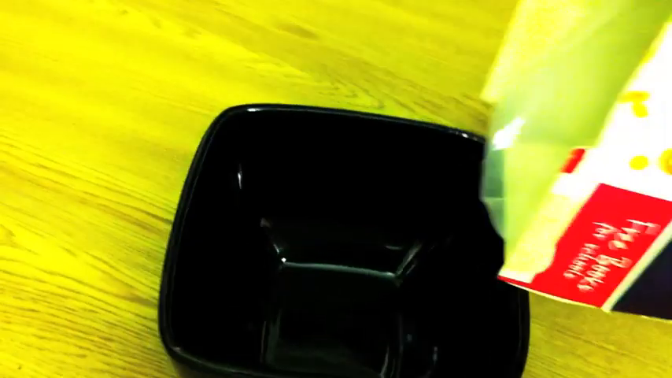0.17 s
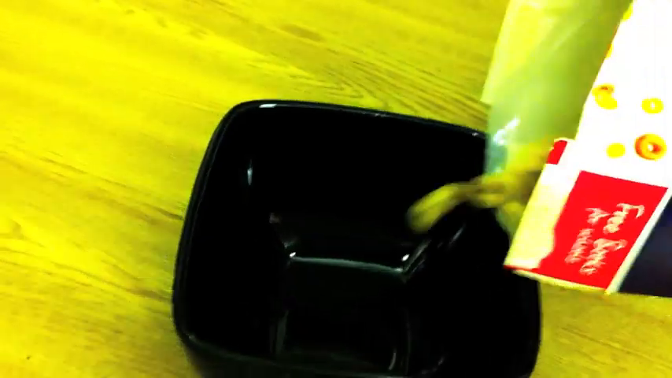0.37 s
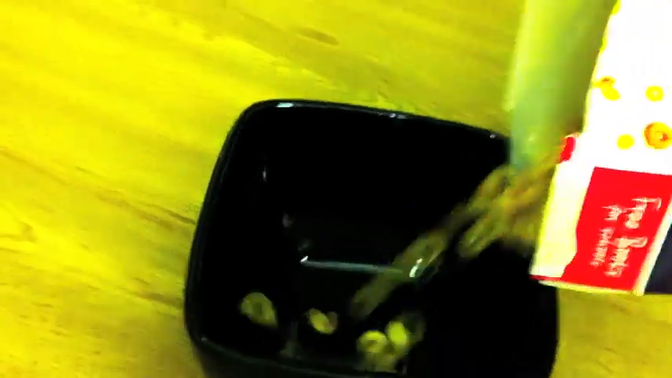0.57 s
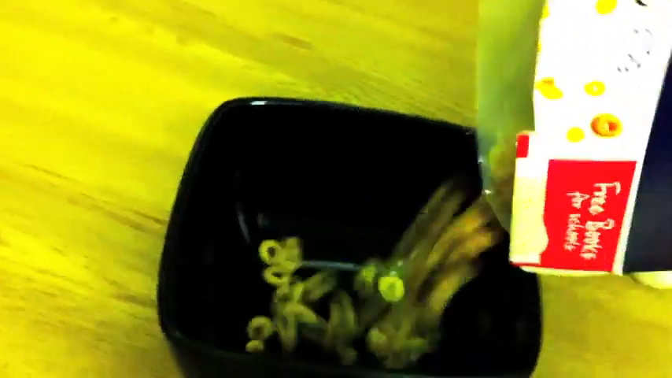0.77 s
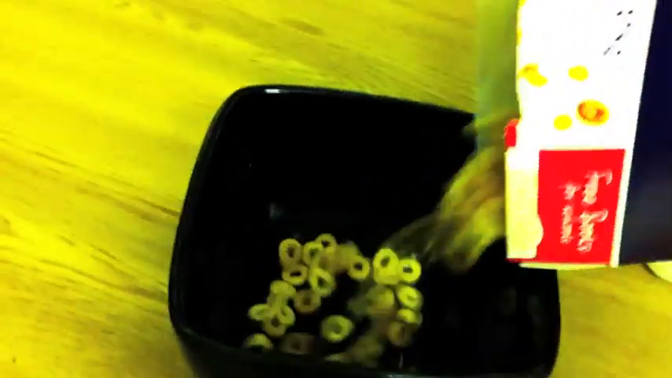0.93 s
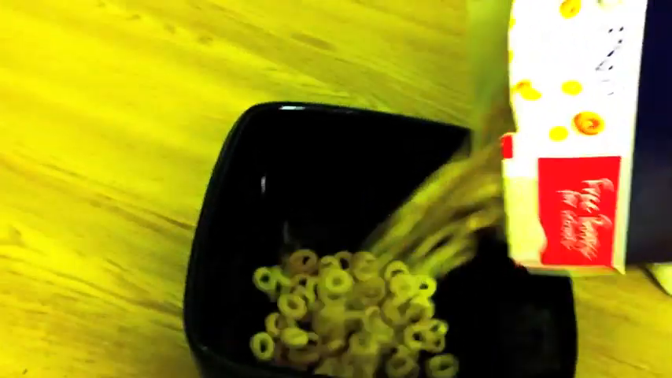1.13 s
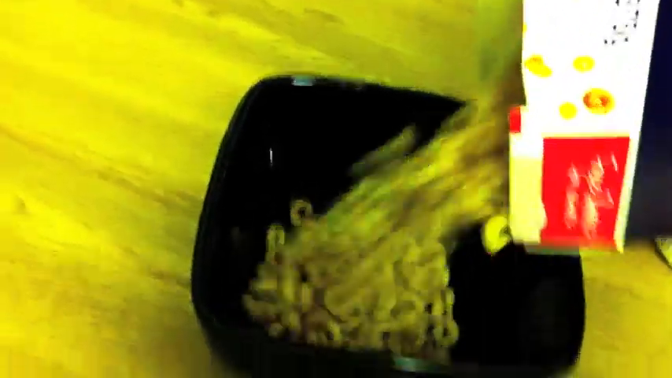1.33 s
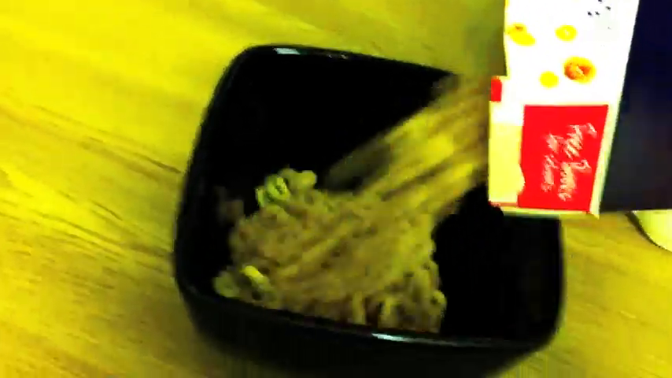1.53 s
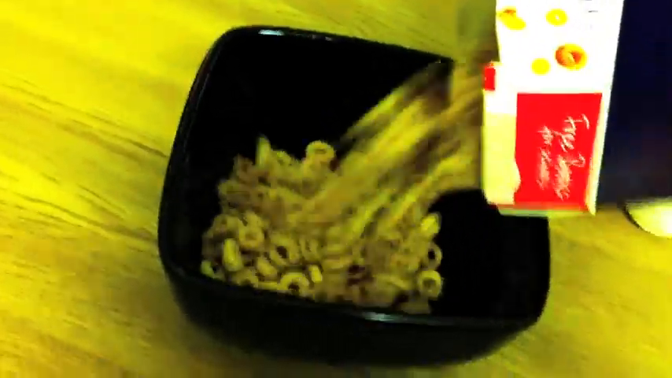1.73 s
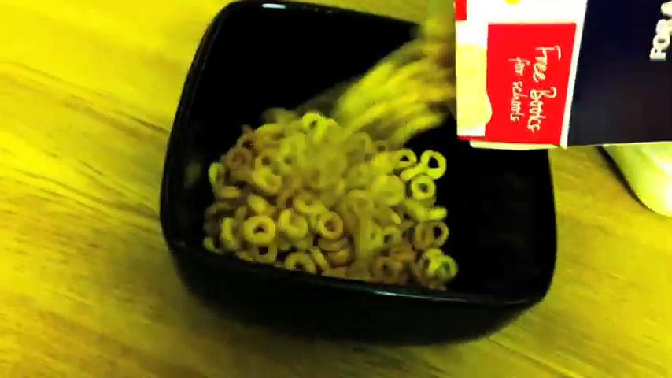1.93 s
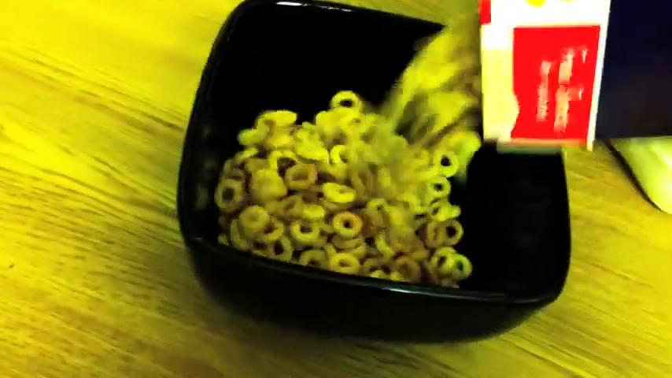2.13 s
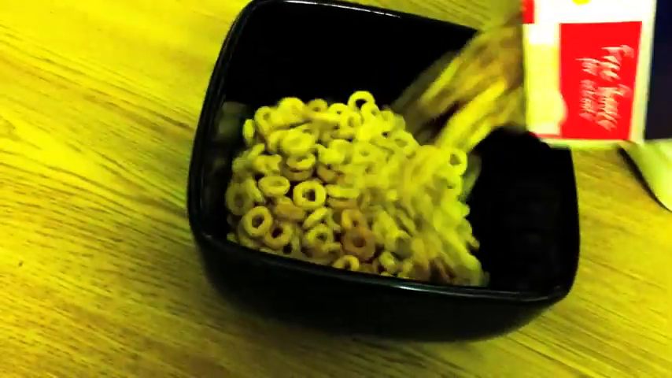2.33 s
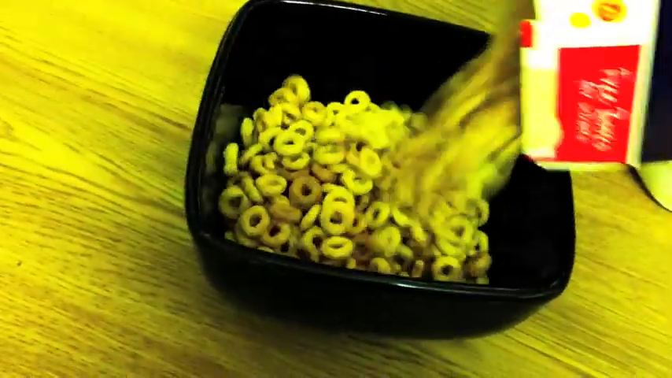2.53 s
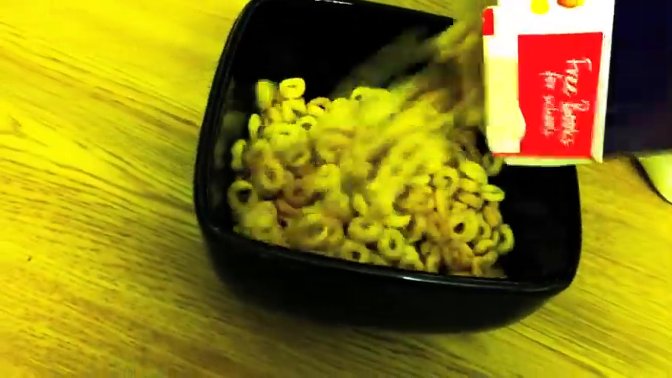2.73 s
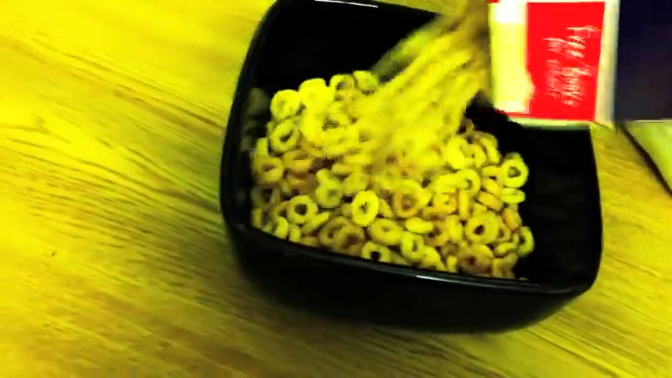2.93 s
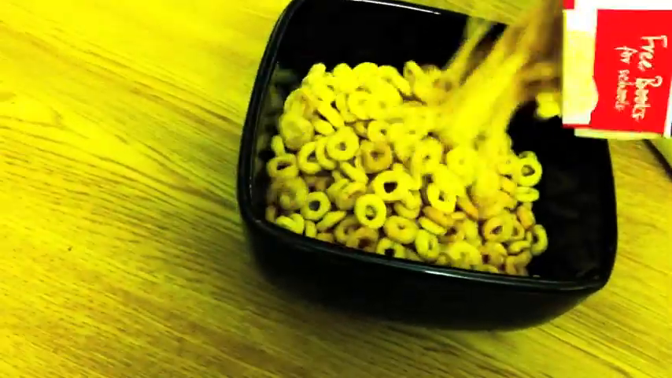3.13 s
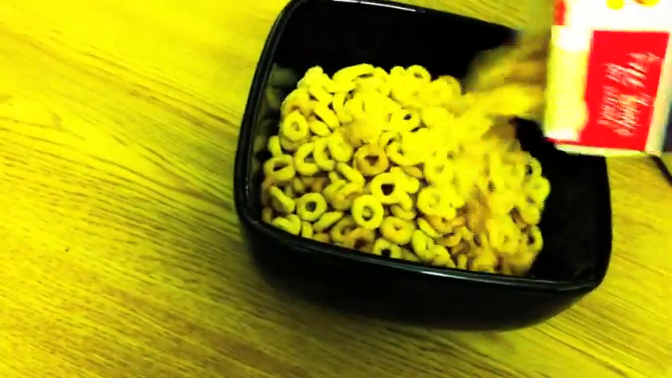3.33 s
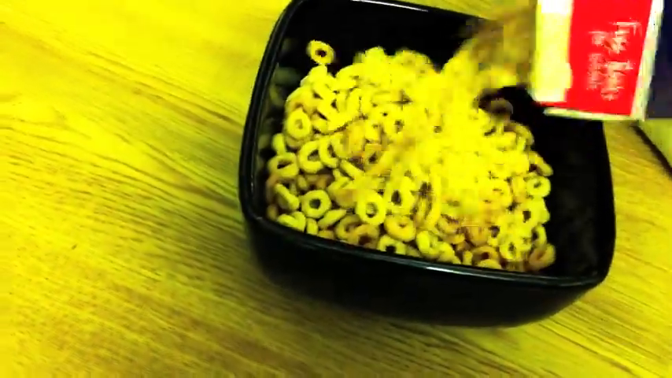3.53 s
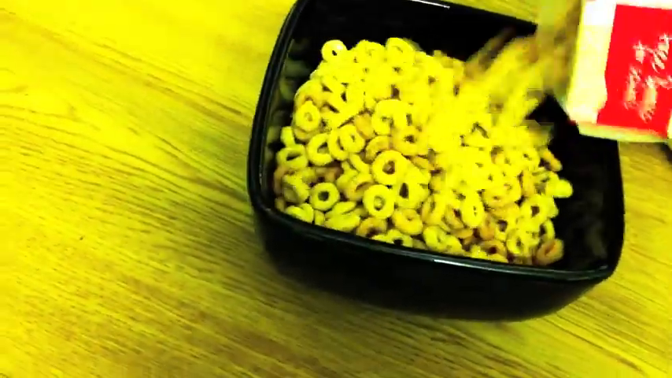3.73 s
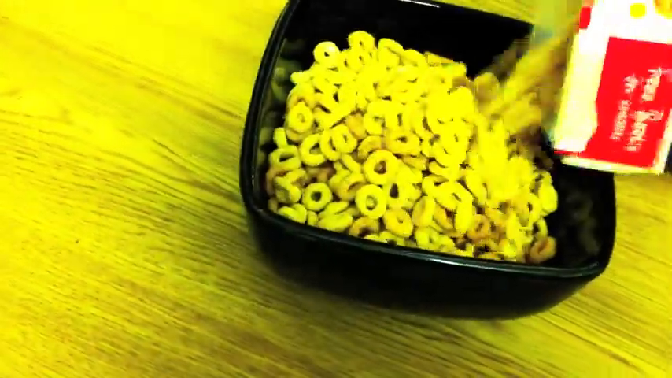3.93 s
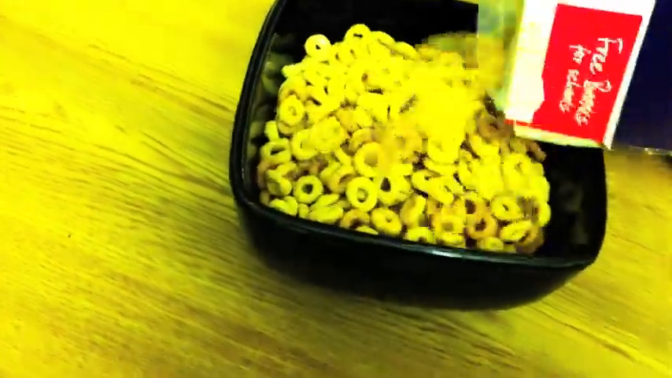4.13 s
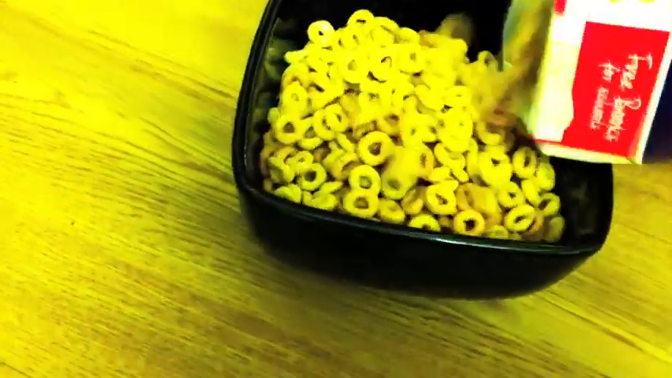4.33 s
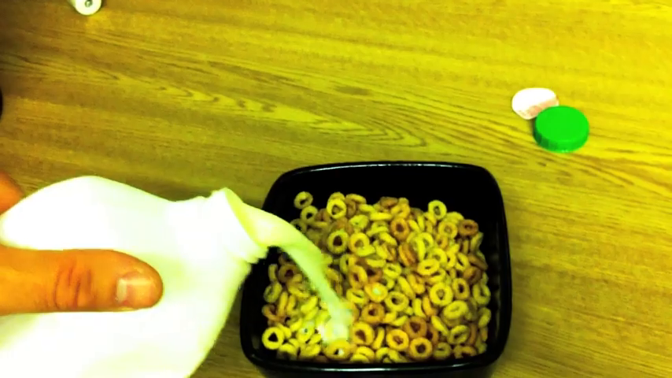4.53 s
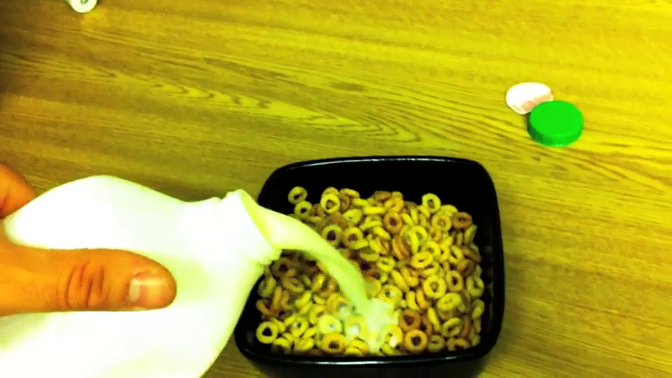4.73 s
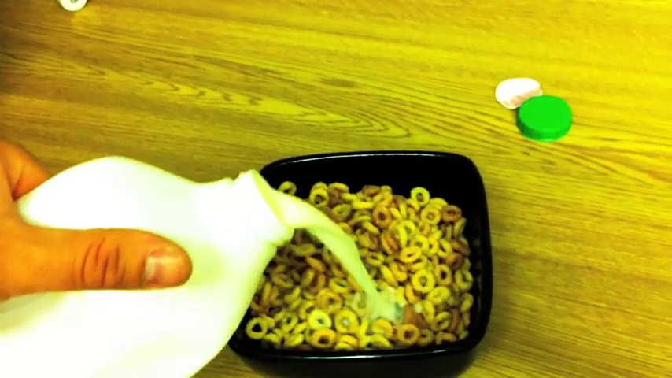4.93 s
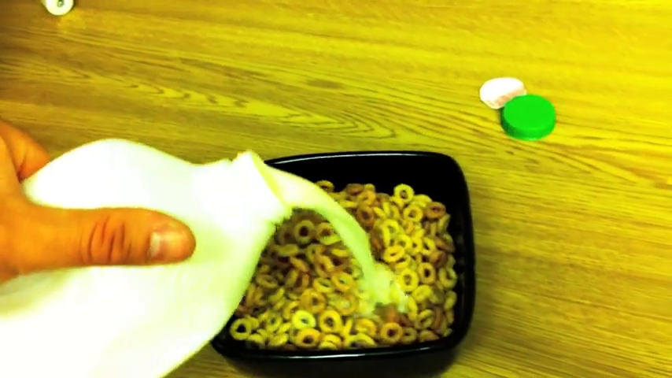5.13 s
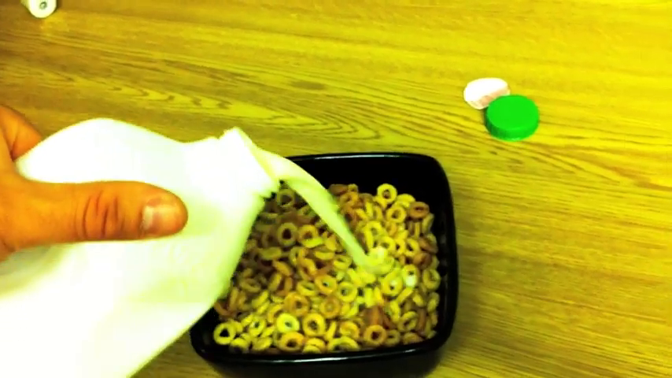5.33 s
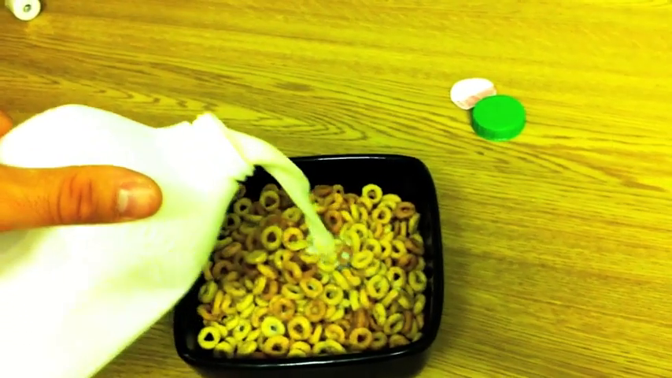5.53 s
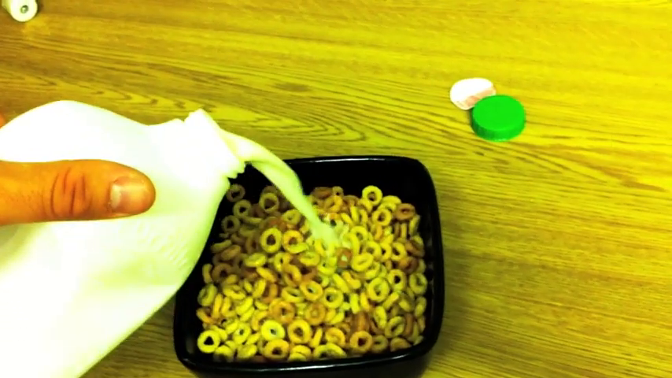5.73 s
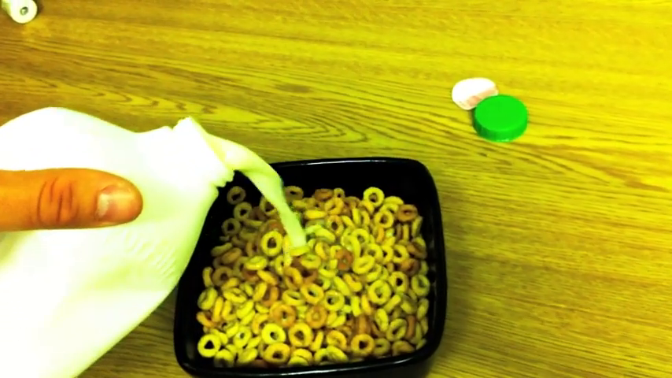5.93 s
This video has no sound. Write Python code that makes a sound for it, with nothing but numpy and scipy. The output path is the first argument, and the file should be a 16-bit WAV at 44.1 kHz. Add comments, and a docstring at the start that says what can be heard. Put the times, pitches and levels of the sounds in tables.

```python
"""First a crinkly scrape with knocks: dry cereal rings slide down a tipped carton, in a small kitchen.
They pour into a hard bowl on a table: clouds of tiny pings rattle hollowly and tick, and hits ring the
bowl's decaying modes, brightly while it is bare and duller on the heap. Soft noise bumps lie below.
The carton is tipped back and the scene fades over to quiet milk: coloured grains trickle and fizz,
rising pings are bubbles, noisy snaps are crackling rings, and steady tones are an appliance's hum."""
import sys
import numpy as np
from scipy import signal
from scipy.fft import rfft, irfft, next_fast_len
from scipy.io import wavfile
from scipy.ndimage import map_coordinates

SR = 44100
rng = np.random.default_rng(int(sys.argv[2]) if len(sys.argv) > 2 else 0)


def file_out(sig):
    """Save sig as 16-bit WAV at sys.argv[1]."""
    # one column per channel
    cols = np.atleast_2d(sig).T
    # limit, then scale
    lim = np.clip(cols, -1, 1)
    pcm = np.round(lim * 32767).astype(np.int16)
    wavfile.write(sys.argv[1], SR, pcm)


N = 268386
TIME_S = np.arange(N) / SR


def amp(db):
    """Decibels to gain."""
    return 10 ** (np.asarray(db) / 20)


def unit(x):
    """Scale to rms 1."""
    return x / np.sqrt(np.mean(x ** 2) + 1e-20)


def along(points, hz):
    """Read (Hz, value) points on a log frequency axis."""
    f, v = np.transpose(points)
    return np.interp(np.log(hz + 1), np.log(f + 1), v)


def curve(rows):
    """Draw straight lines between (time, value) points, one value per sample."""
    s, values = np.transpose(rows)
    return np.interp(TIME_S, s, values)


def gain(rows, edge_s=0.012):
    """Turn a dB curve into a gain that falls silent just outside its span."""
    inside = np.clip(1 + np.minimum(TIME_S - rows[0][0], rows[-1][0] - TIME_S) / edge_s, 0, 1)
    return amp(curve(rows)) * inside


def wobble(rate):
    """A smooth random curve, rate knots a second."""
    knots = rng.standard_normal(int(N * rate / SR) + 4)
    return map_coordinates(knots, [np.arange(N) * rate / SR])


def add(track, s, sound):
    """Mix a sound into the track at s seconds."""
    part = track[max(round(s * SR), 0):][:len(sound)]
    part += sound[:len(part)]


def coloured(x, spectrum, peaks=(), size=8192):
    """Minimum-phase filter: a broad spectrum with narrow resonances (Hz, width Hz, dB) on top."""
    hz = np.fft.rfftfreq(size, 1 / SR)
    level = along(spectrum, hz) + sum(db / (1 + (2 * (hz - f) / width) ** 2) for f, width, db in peaks)
    # folding the cepstrum makes the filter causal
    cepstrum = irfft(np.log(np.maximum(amp(level), 1e-6)))
    cepstrum[1:size // 2] *= 2
    cepstrum[size // 2 + 1:] = 0
    return signal.fftconvolve(x, irfft(np.exp(rfft(cepstrum))))[:len(x)]


def grains(rate, spread_db, life, top_hz, size=96):
    """Tiny contacts at random moments, each a damped ping of its own pitch; even in mean power."""
    rate = np.broadcast_to(rate, N)
    at = np.flatnonzero(rng.random(N) < rate / SR)
    t = np.arange(size) / SR
    spread = np.clip(rng.standard_normal((len(at), 1)), -2, 2)
    # busy moments get weaker grains, which keeps the power even
    strength = amp(spread_db * spread) / np.sqrt(rate[at, None])
    pitch, phase = rng.random((2, len(at), 1))
    pings = strength * np.exp(-t / life) * np.sin(2 * np.pi * (pitch * top_hz * t + phase))
    places = at[:, None] + np.arange(size)
    return unit(np.bincount(places.ravel(), pings.ravel(), N + size)[:N])


def room(x, wet_db, echo_db=-17, count=6, t60=0.14):
    """Direct sound, a few early copies from table and walls, and a noise tail that follows its power."""
    out = np.array(x)
    for delay in rng.uniform(.002, .025, count):
        add(out, delay, amp(echo_db) * x)
    decay = amp(-60 * np.arange(SR // 3) / SR / t60) ** 2
    power = np.abs(signal.fftconvolve(x ** 2, decay / decay.sum())[:len(x)])
    return out + amp(wet_db) * np.sqrt(power) * rng.standard_normal(len(x))


def contact(spectrum, peaks, crunch_db, crunch_t60, wet_db):
    """One blow in the room: a sharp tick of peak 1 and a brief crunch of crumbs behind it."""
    t = np.arange(SR // 4) / SR
    push = 1. * (t == 0)
    crunch = rng.standard_normal(len(t)) * amp(-60 * t / crunch_t60) * (t > .0003)
    blow = push + amp(crunch_db) * crunch / np.linalg.norm(crunch)
    tick_peak = np.abs(coloured(push, spectrum, peaks)).max()
    return coloured(room(blow, wet_db), spectrum, peaks) / tick_peak


# motor tones, rms before a 1 dB trim: f/Hz, level/dB
MOTOR_TONES = [(199.2, -80), (393.0, -81), (640.6, -81), (2023, -80), (2416, -86), (2612, -86)]


def appliance():
    """Faint motor tones whose phase drifts, so they sound slightly unsteady."""
    out = np.zeros(N)
    for hz, db in MOTOR_TONES:
        phase = 2 * np.pi * hz * TIME_S + .4 * wobble(5.4)
        out += np.sqrt(2) * amp(db - 1.0) * np.sin(phase)
    return out


BUMP_ATTACK_S, BUMP_RELEASE_S = 0.02, 0.027
RUMBLE_DB = -83  # faint handling under the bumps
# soft bumps through the table: t/s, held length/s, level/dB
TABLE_BUMPS = [(0.077, 0.046, -69), (0.58, 0.25, -64), (0.793, 0.33, -63), (1.26, 0.1, -66),
               (1.751, 0.06, -69), (1.99, 0.108, -69), (2.282, 0.059, -64), (2.529, 0.056, -69),
               (3.426, 0.032, -69), (3.578, 0.054, -68), (3.83, 0.114, -66)]
# dull colour of the table: f/Hz, level/dB
TABLE_COLOUR = [(15, 2), (30, -6), (70, -3), (110, -2.5), (250, -24.5)]


def table():
    """Dull low noise bumps under the pour: each rises, holds and dies away."""
    level = amp(RUMBLE_DB)
    for s, length, db in TABLE_BUMPS:
        corners = [s - BUMP_ATTACK_S, s, s + length, s + length + BUMP_RELEASE_S]
        level = level + amp(db) * np.interp(TIME_S, corners, [0, 1, 1, 0])
    return level * unit(coloured(rng.standard_normal(N), TABLE_COLOUR))


def bubble(hz, t60, rise_oct_per_s=1.2):
    """A pocket of air in the milk: a soft-edged ping whose pitch rises a little."""
    t = np.arange(SR // 8) / SR
    phase = 2 * np.pi * np.cumsum(hz * 2 ** (rise_oct_per_s * t)) / SR
    return (1 - np.exp(-t * hz)) * amp(-60 * t / t60) * np.sin(phase)


def gurgle(count, scatter_oct, cycles, pocket_hz):
    """Small bubbles at random moments, scattered around one pocket's pitch; rms 1."""
    out = np.zeros(N)
    for when, pitch, size in rng.random((count, 3)):
        hz = pocket_hz * 2 ** (scatter_oct * (2 * pitch - 1))
        add(out, when * N / SR, amp(10 * size) * bubble(hz, cycles / hz))
    return unit(out)


# layer levels before the flow moves them (dB): the stream, and its large and tiny bubbles
TRICKLE_DB, FIZZ_DB, GURGLE_DB, TINKLE_DB = -68, -72, -86, -89
# one swell of the flow: centre (s), half-width at 1/e of its dB (s), height (dB)
SWELL_S, SWELL_WIDTH_S, SWELL_DB = 5.19, 0.37, 3.4
# colour of the running milk: f/Hz, level/dB
TRICKLE_COLOUR = [(25, -20), (70, -29), (100, -24), (150, -10), (230, -9), (300, -6), (400, -6), (700, -10),
                  (1000, -9), (1750, -14), (2750, -14.5), (3200, -18), (5000, -26), (7000, -67)]
# air pockets between the wet rings: f/Hz, width/Hz, level/dB
AIR_POCKETS = [(390, 50, 2), (1000, 200, 1), (2220, 260, -3), (2520, 160, 1), (2760, 140, 3.5)]
# bright colour of fizz and crackles: f/Hz, level/dB
FIZZ_COLOUR = [(1000, -23), (2500, -5), (4500, -3.5), (6500, -4.5), (10000, -5.5), (16000, -9)]
# single bubbles: t/s, f/Hz, level/dB, t60/s
SINGLE_BUBBLES = [(4.87, 200, -62, .09), (4.957, 420, -59, .07), (5.178, 410, -58, .08),
                  (5.28, 2100, -61, .04), (5.4395, 6250, -56, .016), (5.96, 390, -60, .08),
                  (6.01, 400, -59, .08)]
# wetted rings crackling and shifting: t/s, level before trim/dB, f/Hz, resonance level/dB, t60/s
WET_CRACKLES = [(4.628, -56, 12700, 8, .018), (4.76, -51, 10400, 4, .04), (4.776, -44, 2000, 5, .09),
                (4.877, -53, 4330, 8, .018), (4.969, -51, 3000, 4, .04), (5.12, -45, 10500, 8, .006),
                (5.167, -46, 9700, 7, .018), (5.177, -48.5, 11000, 13, .018), (5.467, -55, 4250, 11, .018),
                (5.51, -46, 5500, 2, .025), (5.594, -46, 4760, 6, .025), (5.841, -55, 9810, 17, .018)]


def milk():
    """Milk runs and gurgles softly between the rings, which fizz and now and then crackle."""
    swell_db = SWELL_DB * np.exp(-((TIME_S - SWELL_S) / SWELL_WIDTH_S) ** 2)
    flow = amp(swell_db + 0.2 * wobble(9.5))
    trickle = room(grains(5000, spread_db=3, life=0.00029, top_hz=5460), wet_db=6.5)
    trickle = unit(coloured(trickle, TRICKLE_COLOUR, AIR_POCKETS))
    fizz = room(grains(9000, spread_db=1, life=.0001, top_hz=17000), wet_db=2.0)
    fizz = unit(coloured(fizz, FIZZ_COLOUR))
    low = gurgle(count=320, scatter_oct=0.98, cycles=18, pocket_hz=520)
    high = gurgle(count=300, scatter_oct=.22, cycles=37, pocket_hz=2320)
    running = amp(TRICKLE_DB) * trickle + amp(FIZZ_DB) * fizz
    out = flow * (running + amp(GURGLE_DB) * low + amp(TINKLE_DB) * high)
    for s, hz, db, t60 in SINGLE_BUBBLES:
        add(out, s, amp(db) * bubble(hz, t60))
    for s, db, hz, resonance_db, t60 in WET_CRACKLES:
        # a brittle snap, with a small air pocket ringing in it
        pocket = [(hz, 700, resonance_db)]
        snap = contact(FIZZ_COLOUR, pocket, crunch_db=13.5, crunch_t60=t60, wet_db=-1)
        add(out, s, amp(db - 5.5) * snap)
    return out


WANDER_OCT = .02  # drift of the resonances either way
# hollow resonances of carton and table: f/Hz, width/Hz, level/dB
HOLLOW_MODES = [(255, 22, 5), (402, 16, 5), (535, 40, 2.5), (648, 26, 3), (785, 44, 3.5), (915, 24, 2.5),
                (1205, 24, 3), (1450, 60, 1.5)]


def wandering(x, spectrum):
    """Hollow resonances drift as the load shifts: a random blend of a lower and a higher tuning."""
    def tuned(octaves):
        return coloured(x, spectrum, [(hz * 2 ** octaves, width, db) for hz, width, db in HOLLOW_MODES])

    share = .5 + .5 * np.tanh(wobble(4.43))
    return unit((1 - share) * tuned(-WANDER_OCT) + share * tuned(WANDER_OCT))


CRINKLE_DB = -8  # liner crinkle against the scrape, before colouring
# pieces sliding as the carton tips forward: t/s, level before a 1 dB trim/dB
TIP_FORWARD = [(0.01, -78), (0.026, -58), (0.056, -48), (0.07, -42.5), (0.1, -39), (0.14, -28.5),
               (0.27, -32.5), (0.46, -34), (0.53, -35.5), (0.57, -42)]
# pieces sliding back as the carton is lifted: t/s, level before a 1 dB trim/dB
SLIDE_BACK = [(4.12, -50), (4.28, -51), (4.34, -40.5), (4.39, -38), (4.45, -38), (4.52, -51), (4.53, -74)]
# the carton's side panel: f/Hz, width/Hz, level/dB
SIDE_PANEL = [(259, 57, 3.5)]
# colour of the carton: f/Hz, level/dB
CARTON_COLOUR = [(50, -74), (90, -29), (130, -14), (190, -8), (250, -5.5), (350, -5.5), (750, -3.5),
                 (1500, -2), (2300, -5.5), (3700, -11), (4900, -16.5), (8000, -10), (12000, -19.5),
                 (15800, -17)]
# clumps knocking on the cardboard: t/s, tick level before a 2 dB trim/dB, crunch against the tick/dB
CARTON_KNOCKS = [(0.062, -26, 8), (0.118, -24, 4), (0.147, -21.5, 8), (0.162, -22, 7), (0.187, -14, 3),
                 (0.279, -25, 8), (0.398, -24, 0), (0.444, -22.5, 6), (0.796, -23.5, 7), (1.533, -21, 9),
                 (1.637, -25, 4), (1.687, -21.5, 9), (2.263, -26, 6), (2.308, -26, 7), (2.492, -26.5, 3),
                 (3.72, -26, 8), (3.834, -23.5, 8), (4.129, -32, 6), (4.263, -35, 7), (4.393, -25, 5)]
# cardboard dulls the top of a knock: f/Hz, width/Hz, level/dB
CARDBOARD_DULLING = [(13000, 8000, -5)]


def carton():
    """The mass of rings slides along the crinkling liner, and clumps knock on the cardboard."""
    level = gain(TIP_FORWARD) + gain(SLIDE_BACK)
    scrape = grains(3500, spread_db=5.5, life=0.000092, top_hz=18600)
    crinkle = grains(160, spread_db=3, life=.0002, top_hz=13000)
    slide = room(scrape, wet_db=3.0) + amp(CRINKLE_DB) * room(crinkle, wet_db=-8.5)
    slide = coloured(slide, [(1000, 0)], SIDE_PANEL)
    out = amp(-1.0) * level * wandering(slide, CARTON_COLOUR)
    for s, db, crunch_db in CARTON_KNOCKS:
        knock = contact(CARTON_COLOUR, CARDBOARD_DULLING, crunch_db, crunch_t60=0.077, wet_db=-3.5)
        add(out, s + .001, amp(db - 2.0) * knock)
    return out


def heap(s, covered_s=1.12, covering_s=0.52):
    """Share of the bowl's floor covered at time s: half at covered_s, growing over about covering_s."""
    return .5 + .5 * np.tanh((s - covered_s) / covering_s)


def cover(s, bare_db=3, covered_db=-4.5):
    """Tilt of the bowl's modes at time s, in dB per octave: the growing heap muffles the higher ones."""
    return bare_db + (covered_db - bare_db) * heap(s)


# contacts per second at the strongest flow, which each layer rescales; their share at first
FULL_RATE, FIRST_SHARE = 2000, 0.2
# the stream thickens, and the ticking sets in after the first single pieces, over these times
THICKEN_S, TICK_ONSET_S = 0.75, 0.021
# how strongly the cereal flows as the carton is shaken: t/s, level before trim/dB
CEREAL_FLOW = [(0.56, -40.5), (0.7, -41), (0.9, -41), (1.04, -40.5), (1.22, -38), (1.36, -38.5),
               (1.54, -37.5), (1.62, -39.5), (1.7, -38.5), (1.8, -40), (2.0, -42.5), (2.12, -46),
               (2.2, -39.5), (2.3, -39), (2.62, -40), (2.77, -42), (2.87, -40), (3.0, -41), (3.25, -39),
               (3.4, -43), (3.55, -43.5), (3.72, -42), (3.9, -43.5), (4.22, -49), (4.3, -45.5)]
# treble ticks, highest while the fall is long: t/s, level before trims/dB
TREBLE_LEVEL = [(0.58, -41.5), (0.85, -40.5), (0.98, -35), (1.04, -38), (1.12, -38.5), (1.22, -29.5),
                (1.4, -31), (1.61, -30), (1.76, -36.5), (1.85, -31.5), (1.94, -37.5), (2.04, -37),
                (2.24, -40), (2.37, -36), (2.45, -37), (2.82, -37), (2.92, -42), (2.98, -38.5),
                (3.18, -37.5), (3.52, -42), (3.7, -41.5), (3.92, -43.5), (4.22, -51), (4.3, -46)]


def pour():
    """The pour's course: the gain of the rattle, the gain of the ticks and the contacts per second."""
    flow = gain(CEREAL_FLOW)
    since_s = TIME_S - CEREAL_FLOW[0][0]
    thickened = np.clip(since_s / THICKEN_S, 0, 1) ** 2
    rate = FULL_RATE * flow / flow.max() * (FIRST_SHARE + (1 - FIRST_SHARE) * thickened)
    ticking = gain(TREBLE_LEVEL) * np.clip(since_s / TICK_ONSET_S, 0, 1)
    return flow, ticking, np.maximum(rate, 50)


# the bowl's modes before muffling: f/Hz, level/dB, t60/s
BOWL_MODES = [(2528, -4, .22), (3332, -4.5, .16), (4430, -12, .13), (5642, -13, .1), (6143, 0.5, .15),
              (6828, -2.5, .11), (7155, -3, .09), (8490, -3.5, .08), (8556, -3.5, .08), (9089, 3.5, .1),
              (10258, -9, .07), (11898, -11, .06), (12975, -10, .06)]


def ringing(s, first):
    """The bowl's modes from the first given one up, struck at time s and muffled by the heap."""
    t = np.arange(SR // 4) / SR
    cover_db = cover(s)
    out = np.zeros(len(t))
    for hz, db, t60 in BOWL_MODES[first:]:
        strength_db = db + rng.normal(0, 0.72) + cover_db * np.log2(hz / BOWL_MODES[0][0])
        out += amp(strength_db - 60 * t / t60) * np.sin(2 * np.pi * hz * t)
    return out


def stream_ring(level_db=-17):
    """The stream keeps the bowl's modes faintly ringing, at level_db against the treble ticks' gain."""
    t = np.arange(SR // 3) / SR
    hits = rng.random(N) < 250 / SR
    cover_db = cover(TIME_S)
    out = np.zeros(N)
    for hz, db, t60 in BOWL_MODES:
        mode = amp(-60 * t / t60) * np.sin(2 * np.pi * hz * t)
        ring = unit(signal.fftconvolve(hits * rng.standard_normal(N), mode)[:N])
        out += amp(db + cover_db * np.log2(hz / BOWL_MODES[0][0])) * ring
    return out * amp(level_db) * pour()[1]


# clack against the stronger low mode, two upper modes against the second, spread of the wavering (dB)
CLACK_DB, WALL_UPPER_DB, WAVER_DB = 7, -10, 1.5
# pieces thrown against the upper wall: t/s, first mode level/dB, second mode level/dB (before trim)
WALL_HITS = [(0.616, -50, -38), (0.6497, -40, -40), (0.733, -38, -45), (0.791, -35, -37), (0.846, -40, -46),
             (0.880, -48, -45), (0.964, -45, -50), (1.028, -48, -43), (1.089, -50, -40), (1.156, -50, -40),
             (1.217, -45, -42), (1.2416, -45, -38), (1.275, -50, -42), (1.359, -50, -50), (1.456, -38, -44),
             (1.48, -41, -41), (1.535, -42, -48), (1.622, -48, -48), (1.956, -38, -42), (2.172, -38, -54),
             (2.313, -47, -52), (2.4292, -52, -41), (2.7084, -37, -38), (2.739, -39, -41),
             (2.792, -44, -45), (2.857, -36, -36), (3.035, -50, -45), (3.141, -52, -42), (3.162, -43, -44),
             (3.232, -39, -40), (3.257, -46, -39), (3.314, -43, -54), (3.746, -54, -46), (3.768, -45, -42),
             (4.009, -43, -39), (4.3836, -43, -40)]


def wall_hits():
    """Pieces that hit the bowl's upper wall clack and sound its low modes."""
    t = np.arange(SR // 3) / SR
    out = np.zeros(N)
    for s, first_db, second_db in WALL_HITS:
        upper_db = second_db + WALL_UPPER_DB
        clack = contact(CARTON_COLOUR, (), crunch_db=4, crunch_t60=.02, wet_db=-4)
        add(out, s, amp(max(first_db, second_db) + CLACK_DB) * clack)
        for level_db, (hz, _, t60) in zip([first_db, second_db, upper_db, upper_db], BOWL_MODES):
            # the shifting load detunes the wall from hit to hit; rubbing pieces make the ring waver
            waver = map_coordinates(rng.standard_normal(64), [t * 120])
            detuned_hz = hz * (1 + rng.normal(0, 0.0012))
            mode = amp(-60 * t / t60) * np.sin(2 * np.pi * detuned_hz * t)
            add(out, s, amp(level_db - 3.5 + WAVER_DB * waver) * mode)
    return out


# the piece's resonance, the decay of its snap, and the first contact against that snap
PIECE_WIDTH_HZ, PIECE_DB, LANDING_T60, FIRST_CONTACT_DB = 1800, 4, .0045, 8
# trim of all landings, and how much harder they are on the bare floor than on the full heap (dB)
LANDING_DB, BARE_LANDING_DB = .8, 1.3
# the bowl's ring under a landing (dB), and its extra while empty (dB), dying off over EMPTY_S
RING_DB, EMPTY_DB, EMPTY_S = -30, 11, .08
# crisp colour of the cereal: f/Hz, level/dB
CRISP_COLOUR = [(2760, -44), (4700, -37), (5230, -11.5), (5970, -9.5), (6910, -4.5), (8090, -4.5),
                (8770, -3), (11100, -9), (13100, -10), (14900, -6.5), (15800, -9.5)]
# single pieces striking hard: t/s, level before trims/dB, f/Hz, treble level/dB
HARD_STRIKES = [(0.5798, -22, 6700, -6), (0.6158, -14, 6700, 5), (0.6241, -23, 6600, -4),
                (0.6494, -20, 7300, -7), (0.7016, -25, 8300, -7), (0.716, -27, 7000, 3),
                (0.734, -23, 7100, 0), (0.7404, -22, 8500, 2), (0.7625, -23, 9200, 1),
                (0.7909, -21, 8900, -1), (0.7941, -22, 10500, 5), (0.7988, -21, 8200, -2),
                (0.805, -19, 8000, 1), (0.8139, -25, 8500, 8), (0.8456, -20, 9400, -7),
                (0.85, -24, 9900, -2), (0.8803, -19, 9800, -3), (0.9168, -25, 7200, 1),
                (0.9438, -14, 8400, 4), (0.9514, -18, 9700, -4), (0.9549, -17, 7400, -3),
                (0.9638, -17, 7300, 1), (0.9827, -23, 7200, 4), (0.9861, -22, 8600, -1),
                (0.9904, -19, 8600, -2), (1.0044, -23, 8400, -1), (1.065, -20, 7100, -4),
                (1.0826, -22, 9100, -1), (1.0892, -13, 7900, 0), (1.1322, -22, 8800, -2),
                (1.1379, -18, 9000, -4), (1.1555, -20, 8200, -6), (1.1801, -17, 9800, 5),
                (1.2168, -17, 8800, 2), (1.2297, -18, 8300, 4), (1.233, -17, 9100, 9),
                (1.2742, -19, 6400, -3), (1.3244, -14, 9600, -7), (1.3303, -19, 9800, 1),
                (1.3935, -18, 9800, 0), (1.4382, -21, 7500, 4), (1.4694, -19, 7200, -1),
                (1.4805, -19, 9600, 2), (1.5961, -18, 7500, 1), (1.6807, -22, 8600, -1),
                (1.7233, -23, 7400, -2), (1.8528, -22, 7600, -7), (1.9565, -26, 8900, 0),
                (2.0072, -19, 9000, -7), (2.0152, -22, 7800, -5), (2.0319, -23, 8500, -2),
                (2.1109, -26, 8800, 1), (2.1672, -26, 9100, -3), (2.172, -25, 7600, -2),
                (2.1903, -25, 9300, -4), (2.2564, -27, 7700, 6), (2.2749, -25, 8000, -2),
                (2.3128, -24, 7700, 9), (2.3371, -21, 7400, 0), (2.3772, -20, 7800, -1),
                (2.4051, -24, 8800, -1), (2.4972, -27, 9600, 0), (2.5384, -25, 8000, -2),
                (2.5768, -26, 8000, -3), (2.5893, -25, 10000, -3), (2.6785, -24, 9200, -7),
                (2.7, -24, 9300, 2), (2.7718, -21, 8200, -6), (2.792, -27, 9000, -3),
                (2.8572, -24, 8600, -3), (2.8647, -26, 8800, -5), (2.8694, -24, 8600, -7),
                (2.9605, -27, 8800, -1), (2.9824, -24, 8500, 0), (3.035, -26, 9100, 0),
                (3.055, -25, 8200, -7), (3.095, -26, 8800, -3), (3.103, -26, 6500, 0),
                (3.1611, -22, 9800, 5), (3.2318, -25, 8500, -6), (3.4137, -29, 9300, 1),
                (3.4372, -28, 7000, 9), (3.6305, -28, 9000, -7), (3.6752, -27, 7600, -3),
                (3.686, -25, 9500, -1), (3.695, -27, 9300, 0), (3.7684, -29, 8900, -1),
                (3.8947, -28, 9800, 1), (3.9577, -29, 8000, -1), (3.9953, -32, 8400, -5),
                (4.0767, -31, 8200, -4), (4.178, -32, 9700, -4), (4.1945, -31, 8200, -4),
                (4.2688, -30, 8000, 1), (4.2767, -32, 8700, 5), (4.4398, -26, 9600, -3)]


def strikes():
    """A hard landing clicks, snaps at its own pitch and rings the higher modes, most in the empty bowl."""
    out = np.zeros(N)
    t = np.arange(SR // 4) / SR
    for s, db, hz, treble_db in HARD_STRIKES:
        snap = np.sign(rng.standard_normal(len(t))) * amp(-60 * t / LANDING_T60)
        snap[0] = amp(FIRST_CONTACT_DB)
        peaks = [(hz, PIECE_WIDTH_HZ, PIECE_DB), (14000, 6000, treble_db)]
        tick = coloured(room(snap, wet_db=-4), CRISP_COLOUR, peaks)
        empty = np.exp(-(s - HARD_STRIKES[0][0]) / EMPTY_S)
        landing = tick / np.abs(tick).max() + amp(RING_DB + EMPTY_DB * empty) * ringing(s, first=2)
        level_db = db + LANDING_DB + BARE_LANDING_DB * (0.5 - heap(s))
        add(out, s, amp(level_db) * landing)
    return out


# trim of the ticks, their change on the bare floor, and the spread of the stream's small surges (dB)
TICK_DB, BARE_TICK_DB, SURGE_DB = -1.9, -2, 0.7
# clear clicks: their rate over the contact rate, and their level against the fine ticks (dB)
CLICK_SHARE, CLICK_DB = .12, -7.5
# hollow colour of the falling rings: f/Hz, level/dB
RATTLE_COLOUR = [(47, -49), (90, -38), (140, -12), (250, -4.5), (450, -5.5), (780, -4), (1000, -6),
                 (1800, -0.5), (2600, -7.5), (3700, -10.5), (5000, -14), (6500, -100), (11000, -120)]


def stream():
    """Falling rings rattle hollowly out of the carton and tick on each other in the bowl."""
    rattle_gain, tick_gain, rate = pour()
    covered = heap(TIME_S)
    # both layers share the surges
    surge = amp(SURGE_DB * wobble(21))
    rattle = grains(np.maximum(1.4 * rate, 1200), spread_db=3, life=0.00061, top_hz=5430)
    rattle = wandering(room(rattle, wet_db=5), RATTLE_COLOUR)
    ticks = grains(1.1 * rate + 300, spread_db=1.5, life=0.0003, top_hz=16450)
    # pieces arrive in clumps, so the ticks bunch up
    ticks = ticks * amp(1.2 * wobble(50))
    # as the heap forms, some pieces click out clearly on it
    clicks = covered * grains(CLICK_SHARE * rate, spread_db=1, life=.00045, top_hz=15000)
    ticks = room(ticks, wet_db=-2) + amp(CLICK_DB) * room(clicks, wet_db=-7)
    ticks = unit(coloured(ticks, CRISP_COLOUR))
    tick_level = amp(TICK_DB + BARE_TICK_DB * (1 - covered)) * tick_gain
    return surge * (amp(-0.23) * rattle_gain * rattle + tick_level * ticks)


# centre, spread of its drift, half-width at 1/e of its dB (Hz), and middle depth (dB)
NOTCH_HZ, NOTCH_DRIFT_HZ, NOTCH_WIDTH_HZ, NOTCH_DB = 4920, 190, 270, -11


def notched(x):
    """A narrow hollow in the colour of the pour wanders up and down, deepening and filling."""
    hz, s, z = signal.stft(x, SR, nperseg=512, noverlap=384)
    centre = NOTCH_HZ + NOTCH_DRIFT_HZ * np.interp(s * SR, np.arange(N), wobble(4.3))
    depth = 1 + .8 * np.tanh(np.interp(s * SR, np.arange(N), wobble(9)))
    dip_db = NOTCH_DB * depth * np.exp(-((hz[:, None] - centre) / NOTCH_WIDTH_HZ) ** 2)
    return signal.istft(z * amp(dip_db), SR, nperseg=512, noverlap=384)[1][:N]


# the cereal fades out: t/s, gain
CEREAL_OUT = [(4.5, 1), (4.535, 0.39), (4.57, 0)]
# the milk fades in: t/s, gain
MILK_IN = [(4.52, 0), (4.6, 1)]


def scene():
    """The cereal, then the milk with the hum, the same in both channels."""
    sliding = carton()
    pouring = notched(stream() + stream_ring() + wall_hits() + strikes())
    cereal = sliding + pouring + table()
    mono = curve(CEREAL_OUT) * cereal + curve(MILK_IN) * (milk() + appliance())
    return np.array([mono, mono])


def record(dry, top_hz=15850):
    """A steep band limit removes everything from top_hz up."""
    m = next_fast_len(N + SR // 2)
    kept = np.fft.rfftfreq(m, 1 / SR) < top_hz
    return irfft(rfft(dry, m) * kept, m)[..., :N]


dry = scene()
out = record(dry)
file_out(out)
```